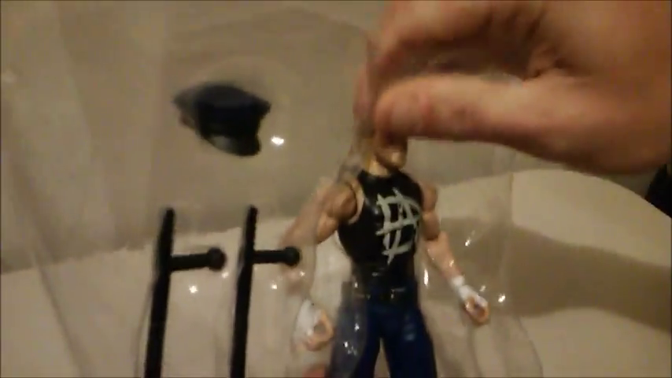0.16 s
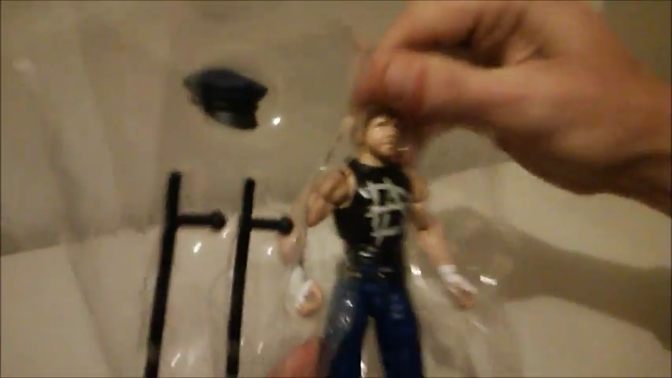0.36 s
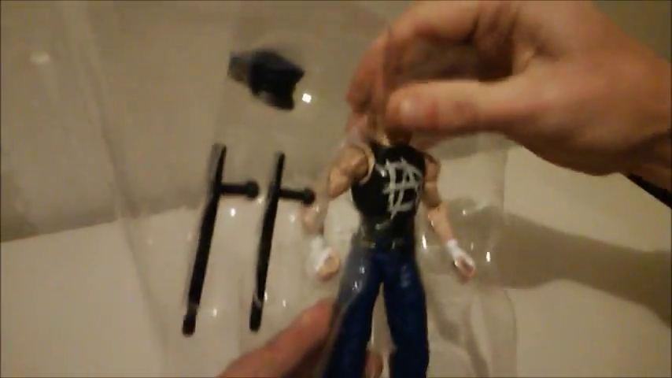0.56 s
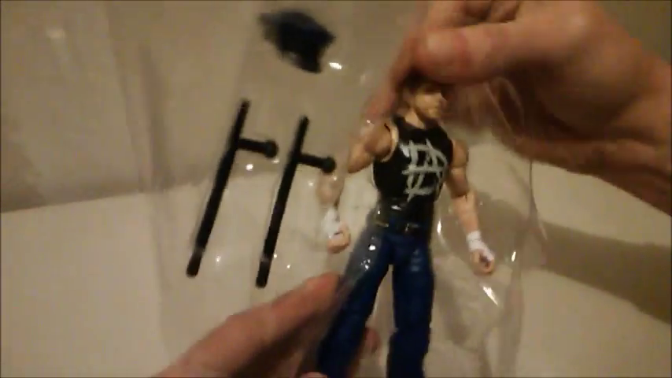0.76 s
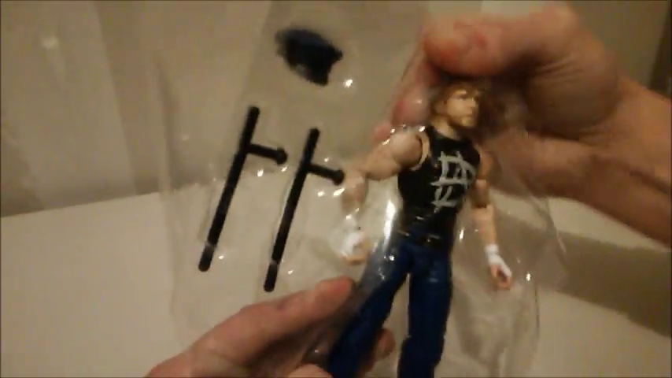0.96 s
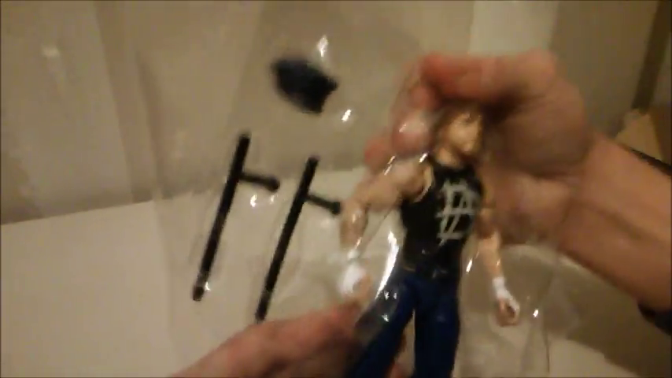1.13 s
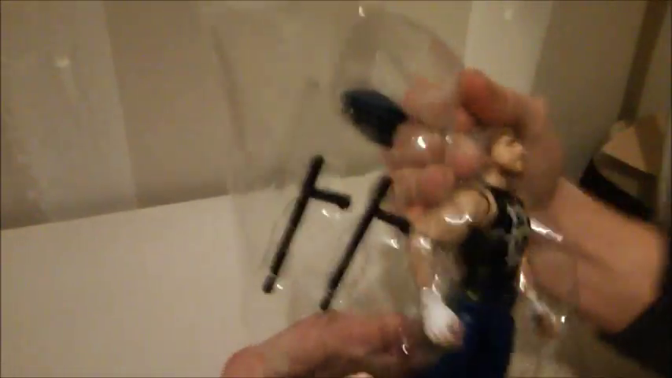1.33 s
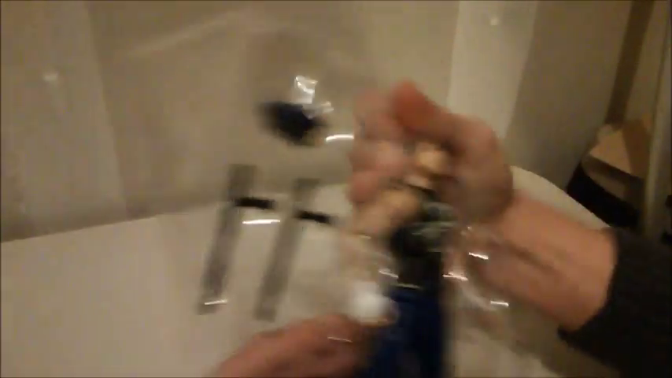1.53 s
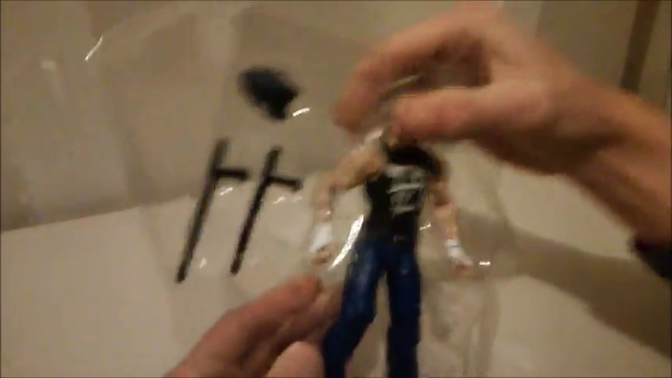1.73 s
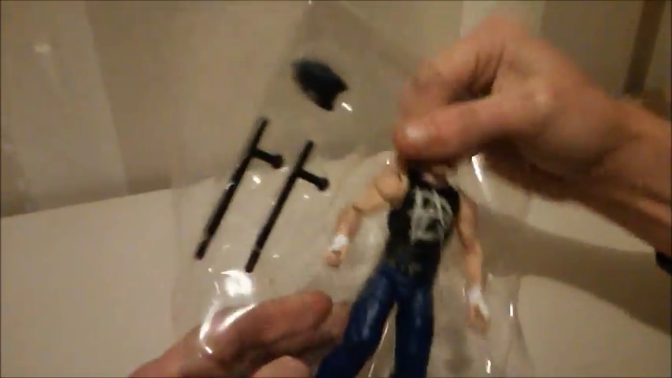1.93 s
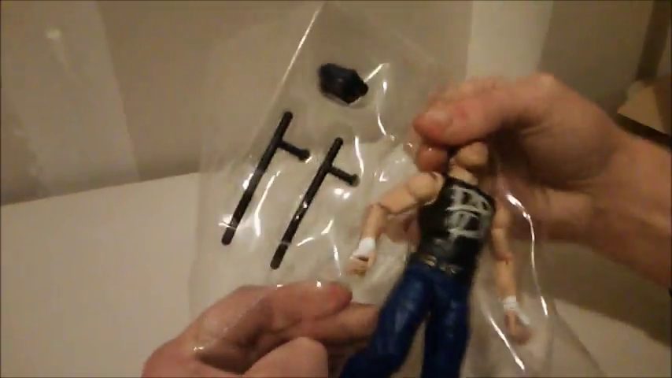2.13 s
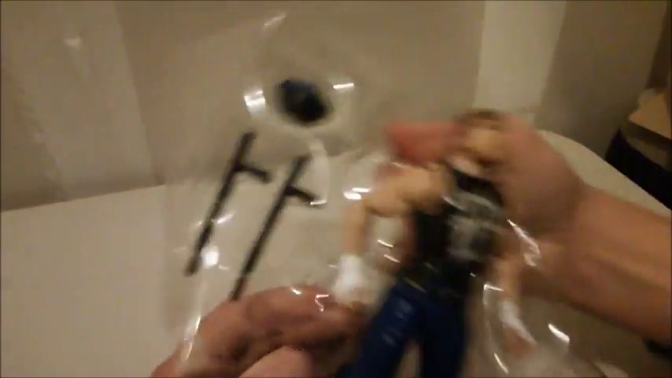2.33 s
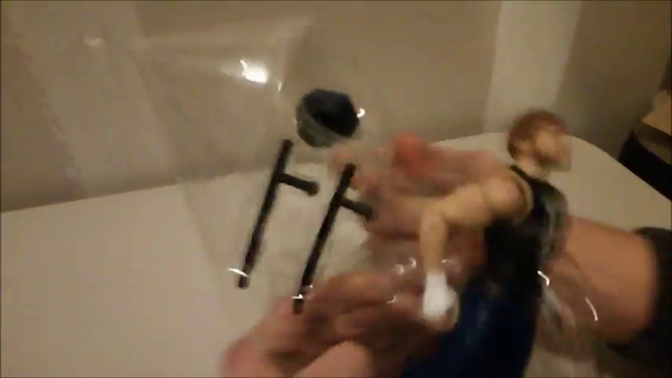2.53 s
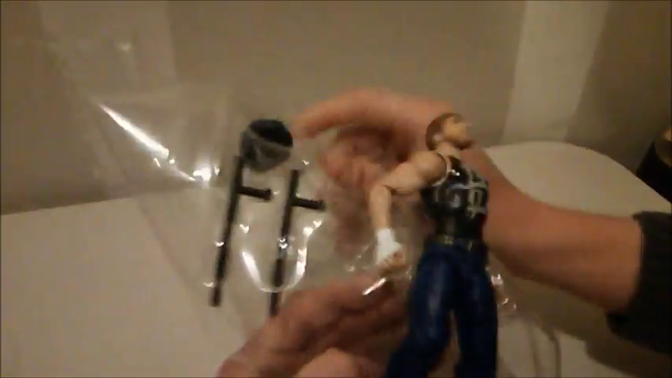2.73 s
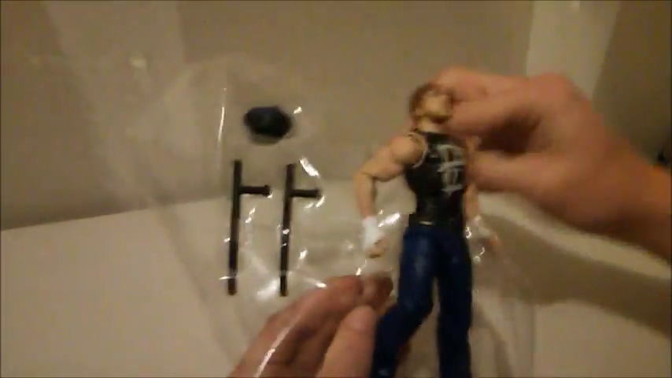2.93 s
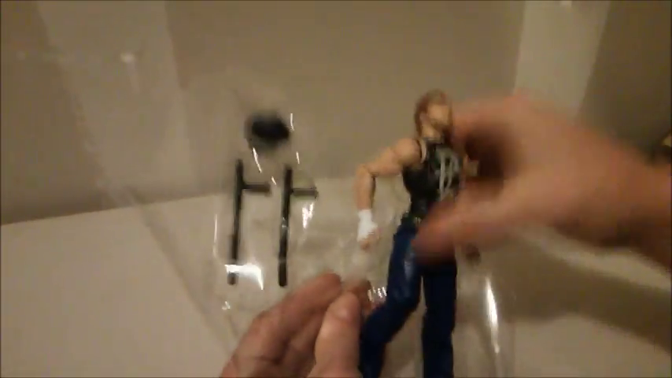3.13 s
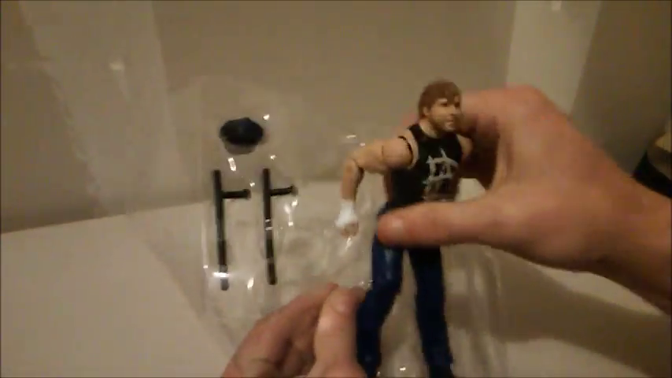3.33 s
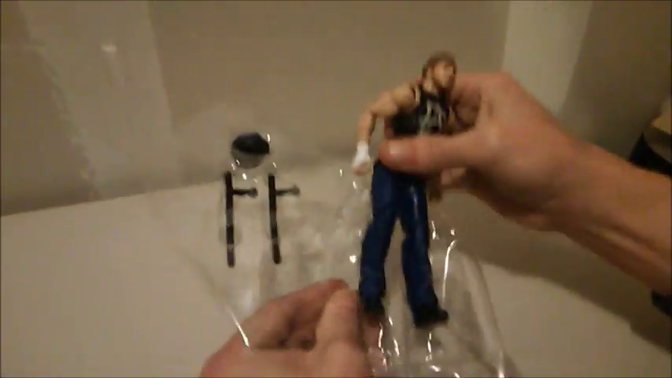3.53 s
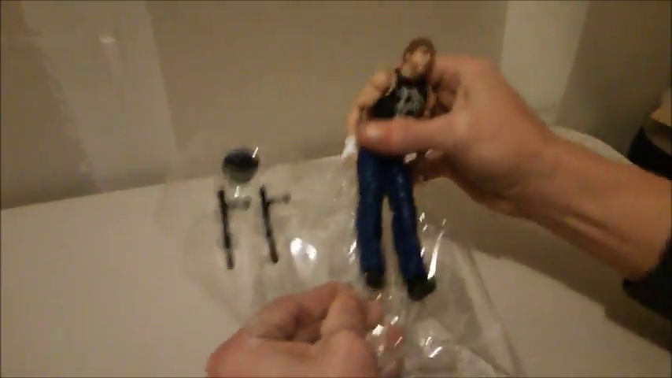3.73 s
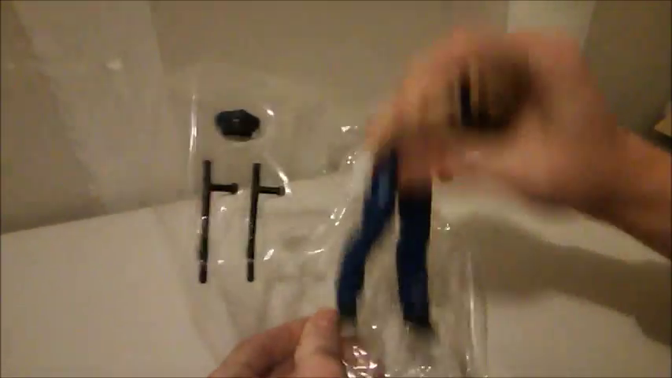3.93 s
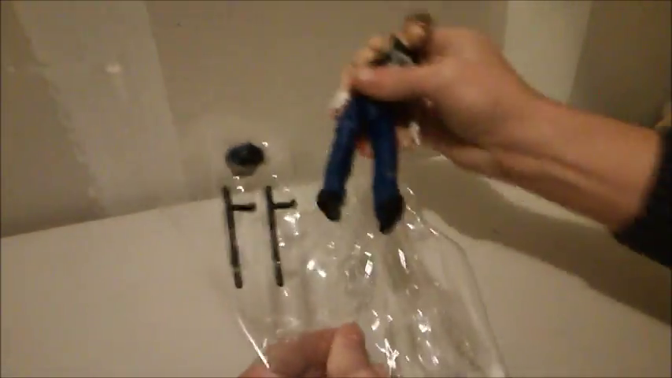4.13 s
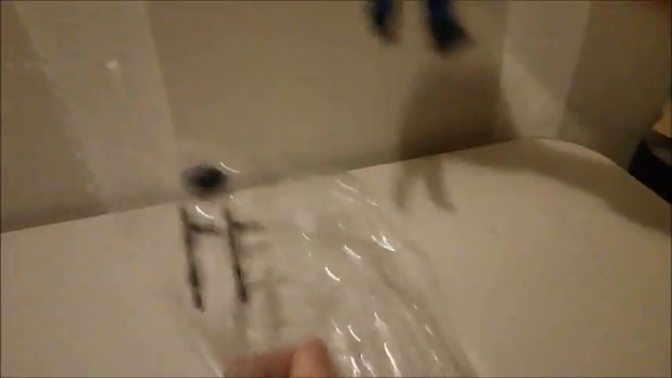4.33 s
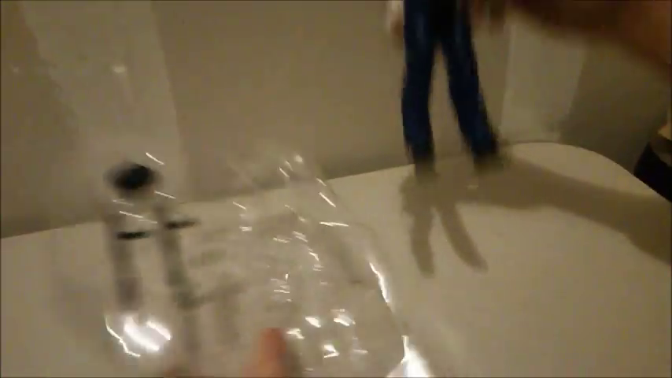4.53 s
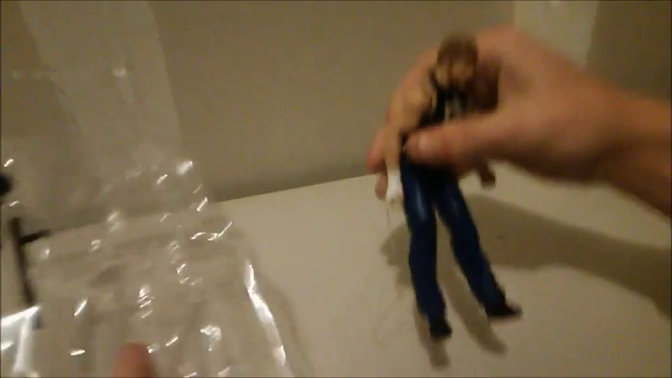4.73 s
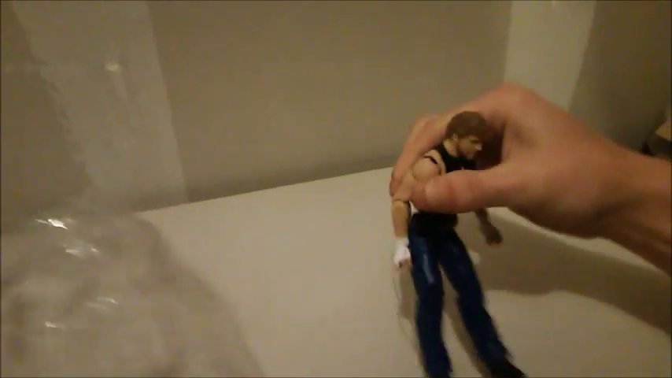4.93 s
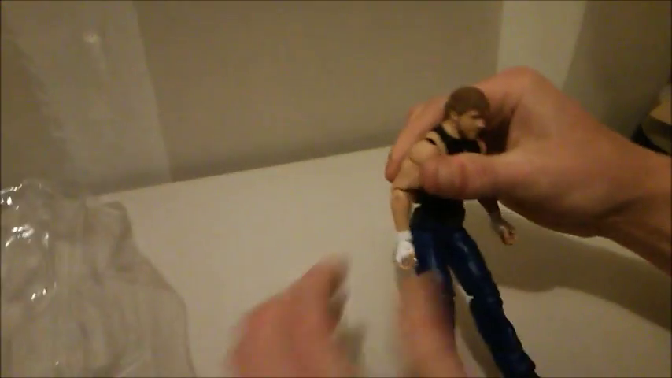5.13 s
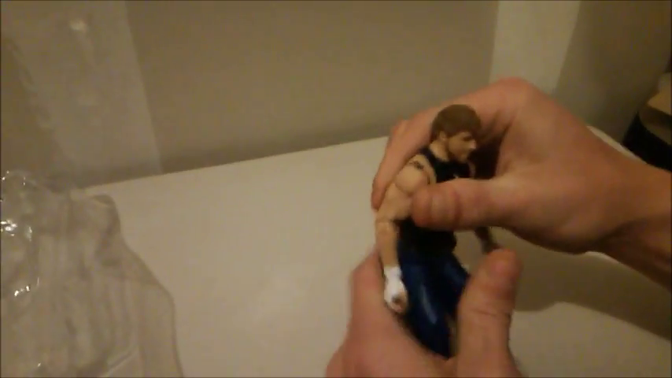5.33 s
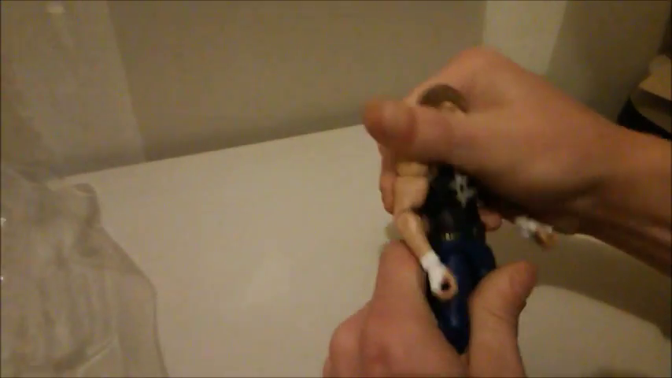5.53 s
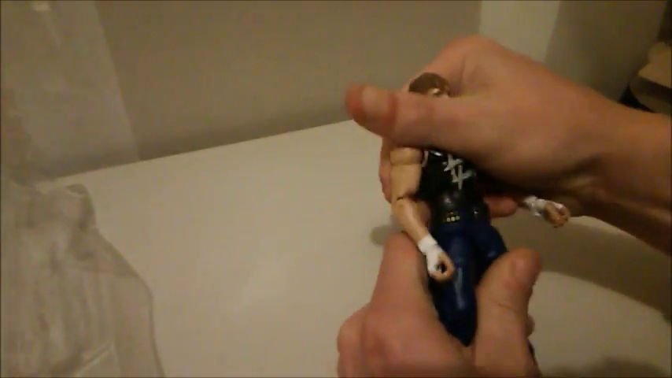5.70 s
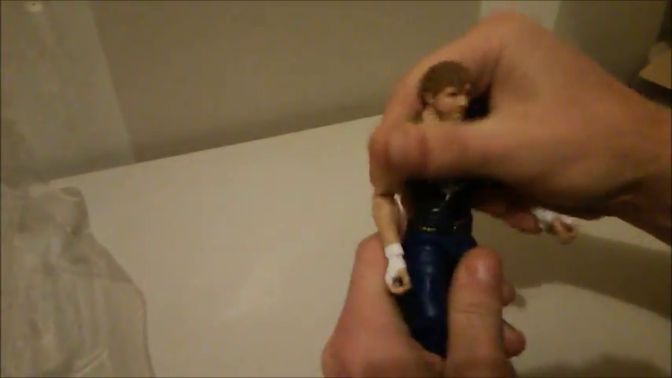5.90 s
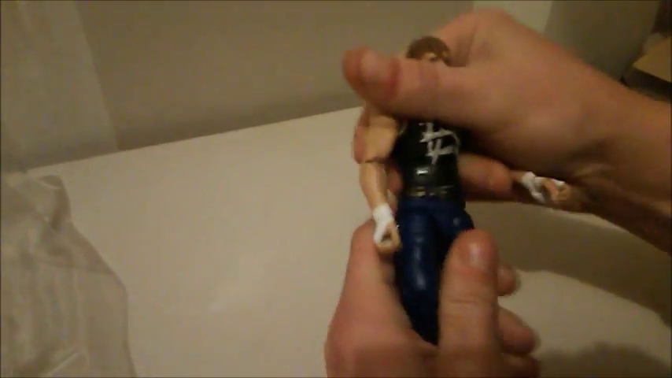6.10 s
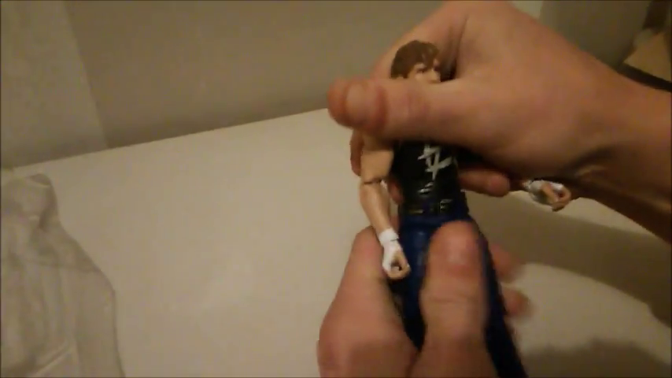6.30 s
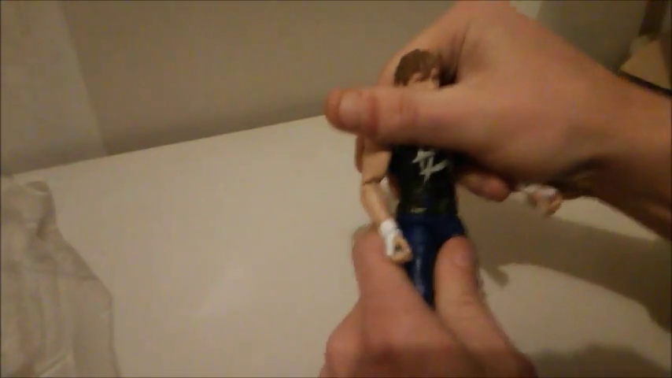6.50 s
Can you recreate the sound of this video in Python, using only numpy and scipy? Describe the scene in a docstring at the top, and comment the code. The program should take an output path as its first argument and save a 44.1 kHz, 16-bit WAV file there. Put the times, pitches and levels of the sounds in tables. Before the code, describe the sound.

Close to the microphone in a quiet room, stiff clear plastic crackles under hands. Scattered snaps grow into dense, harsh crinkling with sharp pops and low thumps of flexing panels, loud enough to distort. The tray is set down with hollow knocks, then only soft clicks, finger rubbing and a faint joint squeak remain.

```python
"""In a room, close to two small microphone ports, hands work a toy figure out of a clear plastic blister tray.
Pulls crackle and creases snap: noise bursts driven by random slips, coloured by a facet and the sheet.
Panels flex in slow cycles of air, bumps ring the tray's modes, and the loudest snaps overload the input.
Then the figure is handled: clicks, fingers rubbing (shaped noise) and a joint squeaking (a wavering sine)."""
import sys
import numpy as np
from scipy import signal
from scipy.fft import rfft, irfft, next_fast_len
from scipy.io import wavfile
from scipy.ndimage import uniform_filter1d

SR = 44100
rng = np.random.default_rng(int(sys.argv[2]) if len(sys.argv) > 2 else 0)


def persist_wave(psi):
    """Save psi, clipped to +-1, as 16-bit WAV."""
    counts = np.round(np.clip(psi, -1, 1) * 32767).astype(np.int16)
    wavfile.write(sys.argv[1], SR, np.atleast_2d(counts).T)


N = 289251

# the hands pull at the tray: (t/s at full force, time held/s, level/dB before the trims of each layer)
HAND_PULLS = [(0, 0.0068, -21), (.26, 0.031, -31.5), (.66, 0.068, -32.5), (.99, 0.12, -11),
              (1.289, 0.046, -3), (1.59, 0.081, -6.5), (1.91, 0.094, -8.5), (2.11, 0.085, -6),
              (2.24, 0.079, -2), (2.53, .11, -6), (2.69, 0.056, -2), (2.86, 0.077, -7), (3.35, .13, -2.5),
              (3.84, .14, -5), (4.05, .11, -12.5), (4.25, 0.19, -11.5), (5.009, 0.081, -26)]
# phase between the two microphone ports: (f/Hz, lead of the left port/rad)
PORT_LEAD = [(90, 2.07), (180, 3.56), (700, 3.35), (1700, 4.2), (3500, 5.11)]


def amp(db):
    """Decibels to gain."""
    return 10 ** (np.asarray(db) / 20)


def evened(x):
    """Scales to an rms of 1."""
    return x / np.sqrt(np.mean(x ** 2) + 1e-20)


def read(points, hz):
    """Reads a table on a log-frequency axis."""
    f, value = np.transpose(points)
    return np.interp(np.log(hz + 1), np.log(f + 1), value)


def follow(rows):
    """Turns a level curve into a gain for every sample."""
    return amp(np.interp(np.arange(N) / SR, *np.transpose(rows)))


def add(mix, s, sound):
    """Adds a sound to the mix at time s, cut off at the end of the mix."""
    part = mix[:, max(round(s * SR), 0):][:, :sound.shape[-1]]
    part += sound[..., :part.shape[1]]


def causal(db):
    """The minimum-phase response with this magnitude: it rings after a click, never before."""
    cepstrum = irfft(np.log(amp(db)))
    half = len(cepstrum) // 2
    cepstrum[1:half] *= 2
    cepstrum[half + 1:] = 0
    return np.exp(rfft(cepstrum))


def radiate(drive, extra_db=0):
    """Two independent drives ring the sheet and reach the two ports, partly alike and out of phase."""
    # what the thin sheet radiates: (f/Hz, level/dB)
    sheet = [(40, -3.5), (150, -8), (380, -0.5), (600, -2.5), (780, 2.5), (1250, -4.5), (1750, 1),
             (2500, -7), (3300, -7), (5700, -5), (6900, -21.5), (10000, -26), (16000, -43.5)]
    # how alike the two ports hear it: (f/Hz, likeness 0-1)
    likeness = [(750, 0.89), (2200, 0.31), (6000, 0.1)]
    size = drive.shape[1]
    hz = np.fft.rfftfreq(size, 1 / SR)
    left, other = rfft(drive) * causal(read(sheet, hz) + extra_db)
    same = np.clip(read(likeness, hz), 0, 1)
    right = same * left + np.sqrt(1 - same ** 2) * other
    right = right * np.exp(-1j * read(PORT_LEAD, hz))
    return irfft(np.array([left, right]), size)


def long_radiate(drive):
    """The sheet under a drive as long as the scene, at an rms of 1."""
    padding = 2 * next_fast_len(N // 2 + 1) - N
    padded = np.pad(drive, ((0, 0), (0, padding)))
    return evened(radiate(padded)[:, :N])


def snap(hz, length, facet_db=9, mode_db=6, ring_s=0.0022, shiver_db=-23, shiver_s=0.024,
         facet_octaves=0.39, bass_ratio=0.041, size=4096):
    """A crease gives way in a quick run of slips; each rings one facet, then the whole sheet shivers briefly."""
    t = np.arange(size) / SR
    slips = (rng.random(size) < 900 / SR) * rng.exponential(1, size) * (t < length)  # 900 slips/s
    slips[0] += 3  # the first slip is the hardest
    ring = np.exp(-2 * t / ring_s) + amp(shiver_db) ** 2 * np.exp(-2 * t / shiver_s)
    power = abs(signal.fftconvolve(slips, ring)[:size])
    power = power * np.minimum(t / 0.0002, 1)
    # the facet favours a broad band, with a few sharp modes of its own scattered about it
    ratio = (np.fft.rfftfreq(size, 1 / SR) + 20) / hz
    octaves = np.log2(ratio)
    modes = sum(1 / (1 + ((octaves - at) / .05) ** 2) for at in rng.normal(0, .7, 3))
    colour_db = facet_db * np.exp(-.5 * (octaves / facet_octaves) ** 2) + mode_db * modes
    colour_db -= 10 * np.log10(1 + (bass_ratio / ratio) ** 2)  # small facets move little air at low pitch
    sound = radiate(np.sqrt(power) * rng.standard_normal((2, size)), colour_db)
    sound *= np.minimum(1, 2 * (1 - t / t[-1]) ** 2)  # fade to silence
    return sound / np.sqrt(np.mean(sound[:, t < length + .001] ** 2))


def snaps(rows):
    """Each snap beams its facet's colour at the microphones; the whole sheet spills a plainer sound."""
    direct, spill = np.zeros((2, 2, N))
    for s, db, hz, length in rows:
        add(direct, s, amp(db) * snap(hz, length))
        add(spill, s, amp(db) * snap(hz, length, facet_db=2, mode_db=0))
    return np.array([direct, spill])


def creases(per_s=32, scatter_db=5, over_pull_db=1.5, low_hz=910, high_hz=6100, mean_s=.004):
    """While a pull lasts, lesser creases give way at uneven intervals, louder the harder the pull."""
    rows = []
    for (s, hold, db), chances in zip(HAND_PULLS, rng.random((len(HAND_PULLS), 20, 4))):
        for k, (late, strength, facet, run) in enumerate(chances):
            wait = (k + late) / per_s
            if wait < hold:
                level_db = db + over_pull_db + scatter_db * (2 * strength - 1)
                hz = low_hz * (high_hz / low_hz) ** facet
                rows.append((s + wait, level_db, hz, 2 * run * mean_s))
    return rows


def strain(build_db_per_s=330.5, relax_db_per_s=140):
    """Gain of the crackle: each pull builds quickly, holds and ebbs more slowly, over the rustle of the grip."""
    # the sheet rustles in the grip until the tray is put down: (t/s, level/dB before the crackle's trim)
    grip = [(0, -37), (.9, -25), (1.2, -21), (4.5, -22), (4.9, -29.5), (5.1, -36.5), (5.2, -51.5),
            (5.45, -60)]
    t = np.arange(N) / SR
    power = follow(grip) ** 2 * np.clip((grip[-1][0] - t) * 20, 0, 1)
    for s, hold, db in HAND_PULLS:
        building = build_db_per_s * np.maximum(s - t, 0)
        relaxing = relax_db_per_s * np.maximum(t - s - hold, 0)
        power += amp(db - building - relaxing) ** 2
    return np.sqrt(power)


def crackle(per_s=260, spread_db=4, scrape_db=-14, level_db=-1, low_hz=1100, high_hz=5800, count=60):
    """Many small facets buckle again and again, each with its own short ring, over a scrape of sheet on sheet."""
    sizes = amp(spread_db * np.minimum(rng.exponential(1, N), 3))
    sizes = sizes * (rng.random(N) < per_s / SR) * rng.choice([-1, 1], N)
    # one buckle sets off its neighbours, so they come in clumps
    clumps = evened(uniform_filter1d(rng.standard_normal(N), size=600))
    sizes *= amp(4 * np.tanh(clumps))
    facets = [snap(hz, 0, facet_db=8, mode_db=3) for hz in np.geomspace(low_hz, high_hz, count)]
    which = rng.integers(0, count, N)
    grains = np.zeros((2, N))
    for i in np.flatnonzero(sizes):
        add(grains, i / SR, sizes[i] * facets[which[i]])
    scrape = amp(scrape_db) * long_radiate(rng.standard_normal((2, N)))
    return amp(level_db) * strain() * (evened(grains) + scrape)


def flexes(rise_s=0.0072, flutter_db=-15, flutter_s=0.014, lead=1.2):
    """A popping panel pushes a couple of slow cycles of air at both ports, and flutters as it settles."""
    # a whole panel pops over: (t/s, level/dB, f/Hz)
    panel_pops = [(0.451, -23.5, 63), (1.296, -18.5, 61.4), (1.653, 2, 67.7), (1.894, -8.5, 65),
                  (2.132, 4.5, 66.7), (2.188, -6.5, 70), (3.348, -10, 70), (4.238, -7, 137)]
    out, t = np.zeros((2, N)), np.arange(SR // 6) / SR
    low = signal.butter(2, [110, 300], "bandpass", fs=SR, output="sos")
    for s, db, hz in panel_pops:
        turn = 2 * np.pi * hz * t
        push = (t / rise_s * np.exp(1 - t / rise_s)) ** 2 * np.sin([turn, turn - lead])  # lead in rad
        noise = evened(signal.sosfilt(low, rng.standard_normal((2, len(t)))))
        flutter = t / flutter_s * np.exp(1 - t / flutter_s) * noise
        add(out, s, amp(db) * (push + amp(flutter_db) * flutter))
    return out


def knocks(level_db=-3):
    """Bumps ring the decaying modes of the hollow tray, which shift with the grip."""
    # hollow plastic is bumped: (t/s, level/dB before the common trim)
    bumps = [(0.292, -12), (1.125, -9), (4.74, -2.5), (4.934, -10.5), (4.991, 1.5), (6.2, -31)]
    # modes of the tray: (f/Hz before the shift, level/dB, t60/s)
    tray_modes = [(169, -2.5, 0.075), (366, 4.5, 0.064), (601.5, 0.5, 0.11), (890, -3, .06)]
    out, t = np.zeros((2, N)), np.arange(SR // 6) / SR
    for s, db in bumps:
        for hz, mode_db, t60 in tray_modes:
            turn = 2 * np.pi * (hz * rng.uniform(.9, 1.1) * t + rng.random())
            ports = np.sin([turn, turn - read(PORT_LEAD, hz)])
            decay = amp(db + level_db + mode_db - 60 * t / t60)
            add(out, s, decay * np.minimum(t / 0.00075, 1) * ports)
    return out


def figure(sag_hz_per_s=210):
    """Fingers rub the toy as noise, and a slipping joint squeaks, wavering in pitch and strength."""
    # fingers rub the figure: (t/s, level/dB)
    rubbing = [(5.3, -49.5), (5.72, -65.5), (5.95, -61), (6.0, -46), (6.15, -53.5), (6.18, -32),
               (6.33, -44), (6.56, -56)]
    # a tight joint slips: (t/s, level/dB, starting f/Hz before the waver, length/s)
    joint_slips = [(6.133, -26, 470, 0.032), (6.319, -35, 1027, .25)]
    out = follow(rubbing) * long_radiate(rng.standard_normal((2, N)))
    for s, db, hz, length in joint_slips:
        n = round(length * SR)
        sag = sag_hz_per_s * np.arange(n) / SR  # the pitch drops as the joint slows
        drift, grip = evened(uniform_filter1d(rng.standard_normal((2, n)), size=130))
        turn = 2 * np.pi * np.cumsum(hz * (1 + .035 * drift) - sag) / SR
        ports = np.sin([turn, turn - read(PORT_LEAD, hz)])
        add(out, s, amp(db) * signal.windows.hann(n) * (1 + .5 * grip) * ports)
    return out


def room(x, gap_s=.004):
    """Sparse reflections from table and walls, each band dying at its own speed."""
    # decay of the room: (f/Hz, t60/s)
    room_decay = [(1200, 0.47), (5000, 0.29), (12000, 0.23)]
    taps = rng.choice([-1., 1.], (2, SR)) * (rng.random((2, SR)) < 3000 / SR)  # 3000 reflections/s
    taps = taps * (np.arange(SR) > gap_s * SR)
    hz, t, z = signal.stft(taps, SR, nperseg=256)
    tail = signal.istft(z * amp(-60 * t / read(room_decay, hz)[:, None]), SR, nperseg=256)[1]
    # long waves reach both ports by the same paths
    spectra = rfft(tail)
    shared = 1 / (1 + (np.fft.rfftfreq(tail.shape[1], 1 / SR) / 1300) ** 4)
    spectra[1] = np.sqrt(shared) * spectra[0] + np.sqrt(1 - shared) * spectra[1]
    tail = irfft(spectra)
    return signal.fftconvolve(x, tail / np.linalg.norm(tail[0]), axes=1)[:, :N]


def lean(x):
    """Tips each band toward the left or the right port."""
    # the hands are a little to the right: (f/Hz, left minus right level/dB)
    side_balance = [(60, 0), (130, 0), (290, -1.5), (640, -2.5), (1410, -4.5), (3100, 1), (6820, -2),
                    (15000, 7)]
    size = next_fast_len(N)
    half_db = read(side_balance, np.fft.rfftfreq(size, 1 / SR)) / 2
    return irfft(rfft(x, size) * amp([half_db, -half_db]), size)[:, :N]


def scene(room_db=-11.0, rumble_db=-70):
    """All the handling, close and in the room, over a faint rumble of low-passed and high-passed noise."""
    # a crease or a joint snaps and stands out: (t/s, level/dB, facet f/Hz, length of the buckling/s)
    standout_snaps = [(.102, -18, 800, 0.0054), (.134, -18, 5400, 0.0025), (.244, -9, 1590, .003),
                      (.291, -14, 840, 0.0062), (.339, -5.5, 5550, 0.0028), (.435, -13.5, 3900, 0.0061),
                      (.453, -1, 3400, 0.0046), (.543, -4.5, 1600, 0.0023), (.574, -16.5, 2540, 0.0019),
                      (.652, 2.5, 1350, .008), (.74, -4, 1520, 0.0071), (.774, -3, 4860, 0.0033),
                      (.835, -3.5, 1440, 0.0017), (.95, -8, 1430, 0.00091), (.975, -1, 2850, 0.0024),
                      (.997, 5, 840, 0.0053), (1.051, -0.5, 940, 0.004), (1.123, -8.5, 750, 0.0095),
                      (1.3, -3, 4600, 0.019), (1.408, -5.5, 3780, .008), (1.452, -5.5, 3270, 0.0035),
                      (1.549, 1, 2950, 0.0024), (1.597, -7.5, 5200, 0.0033), (1.686, 3.5, 870, 0.0035),
                      (1.801, -1.5, 1080, 0.0046), (1.819, 3, 5500, 0.0014), (1.876, -1.5, 5200, .003),
                      (1.896, -1, 6100, 0.0032), (1.921, 3.5, 760, 0.0054), (2.037, -5.5, 4110, .005),
                      (2.104, -1.5, 4130, 0.0055), (2.133, 3.5, 3400, 0.00092), (2.302, -1, 4460, 0.0077),
                      (2.353, 5, 2850, 0.0014), (2.409, -6.5, 2100, 0.0013), (2.528, 9, 750, 0.0013),
                      (2.902, 4, 1590, 0.0081), (3.028, -7.5, 2030, 0.0057), (3.112, -7, 1580, 0.0051),
                      (3.153, -10.5, 3840, 0.0076), (3.18, -7, 1930, .006), (3.221, -7, 5900, 0.0024),
                      (3.232, 3.5, 5800, 0.0054), (3.317, -5, 4160, 0.0033), (3.344, -3.5, 2450, 0.013),
                      (3.533, -3, 3410, .012), (3.622, -1, 3870, 0.013), (3.805, -4, 5160, 0.0035),
                      (3.823, -3.5, 4500, .014), (3.892, 0.5, 1850, 0.023), (4.058, -3.5, 815, 0.0062),
                      (4.1, 6, 1330, 0.0087), (4.162, 0.5, 1125, 0.0084), (4.195, -5, 3070, 0.008),
                      (4.241, 4.5, 1150, 0.029), (4.45, 0, 3720, 0.0059), (4.478, -2.5, 1080, 0.0098),
                      (4.524, 1, 6200, 0.0055), (4.735, 4, 1540, 0.0045), (4.749, -2.5, 980, 0.0066),
                      (4.897, -2, 1470, 0.018), (4.931, -7.5, 5700, .003), (4.995, -5, 880, 0.0085),
                      (5.121, -13.5, 760, .004), (5.157, -22, 5500, 0.0076), (5.228, -8, 2010, 0.0056),
                      (5.309, -27, 2000, 0.0038), (5.51, -21, 5000, 0.0031), (6.013, -20.5, 1603, 0.0046),
                      (6.04, -38, 1990, 0.0031), (6.162, -19.5, 2700, .002), (6.169, -23.5, 4500, .014)]
    band = signal.butter(1, [45, 170], "bandpass", fs=SR, output="sos")
    rumble = evened(signal.sosfilt(band, rng.standard_normal((2, N))))
    handling = crackle() + knocks() + figure()
    direct, spill = snaps(standout_snaps) + snaps(creases())
    heard = direct + handling + amp(room_db) * room(spill + handling)
    return lean(heard) + flexes() + amp(rumble_db) * rumble


def record(dry, knee=5, edge_hz=16000):
    """Loud snaps overload the input, which adds their top sizzle; then the band limit."""
    clipped = dry / (1 + abs(dry) ** knee) ** (1 / knee)
    band_limit = signal.firwin(511, edge_hz, window=("kaiser", 7), fs=SR)
    return signal.oaconvolve(clipped, band_limit[None], "same")


dry = scene()
out = record(dry)
persist_wave(out)
```